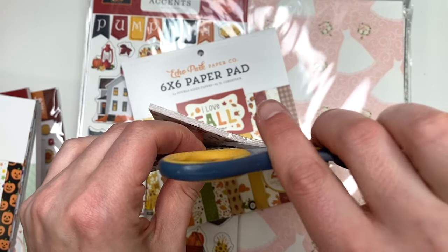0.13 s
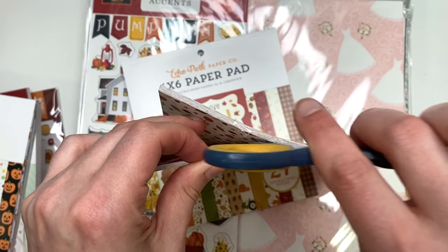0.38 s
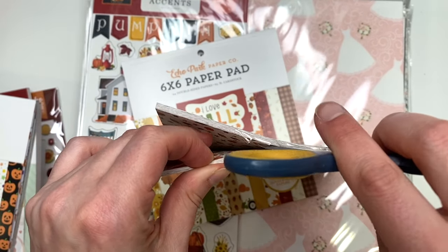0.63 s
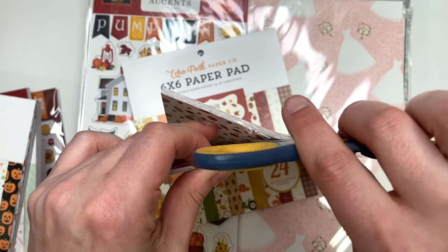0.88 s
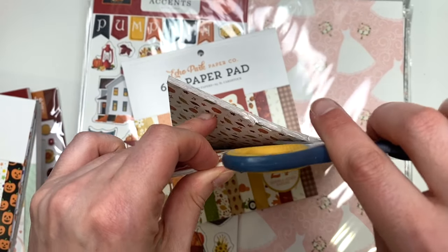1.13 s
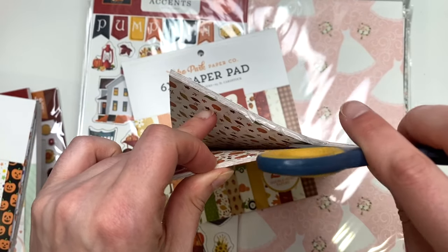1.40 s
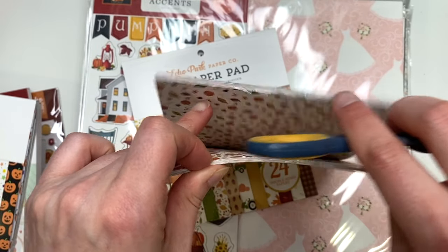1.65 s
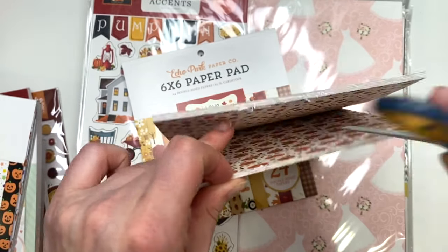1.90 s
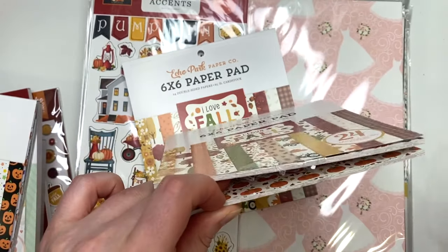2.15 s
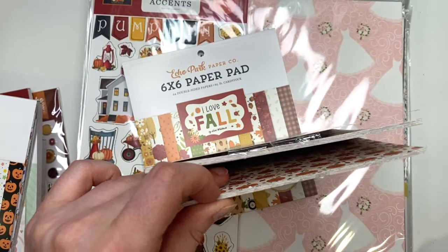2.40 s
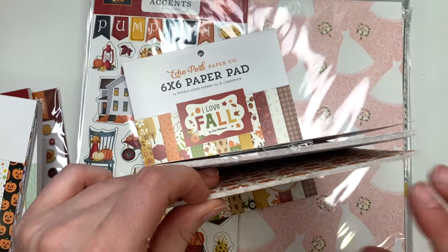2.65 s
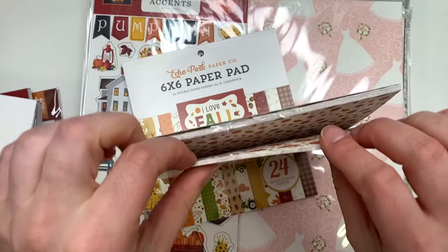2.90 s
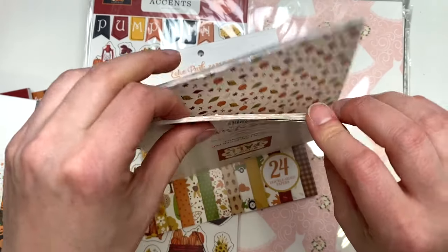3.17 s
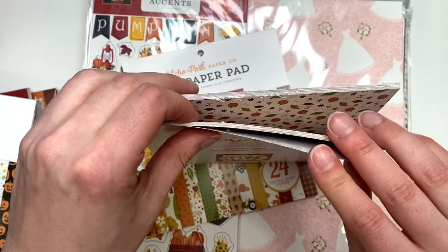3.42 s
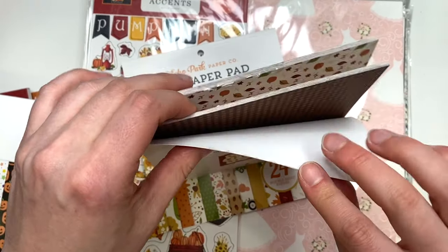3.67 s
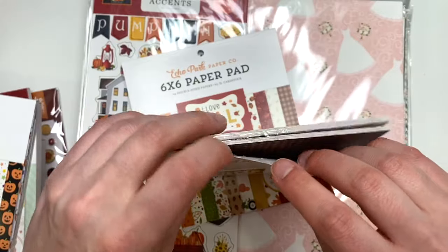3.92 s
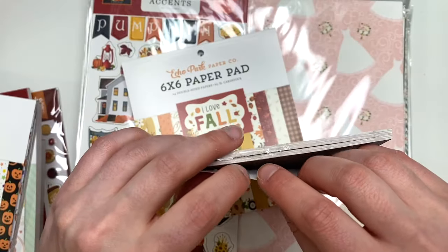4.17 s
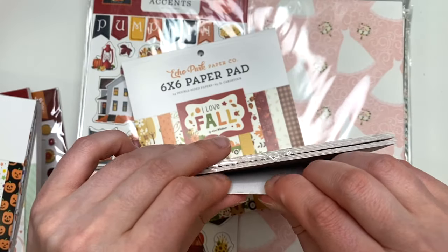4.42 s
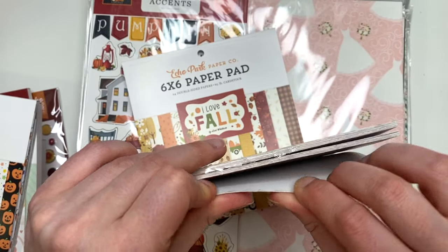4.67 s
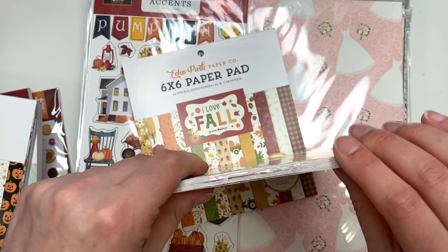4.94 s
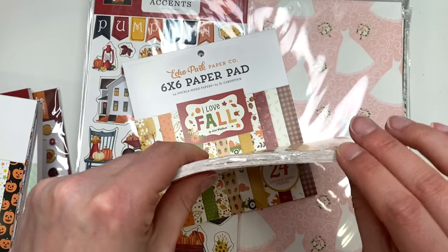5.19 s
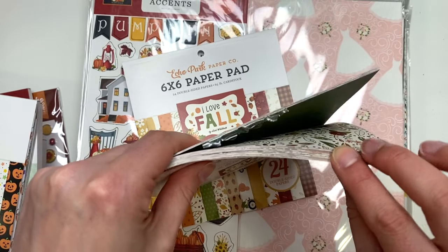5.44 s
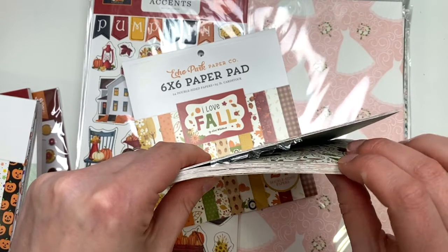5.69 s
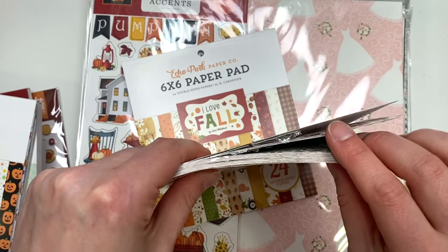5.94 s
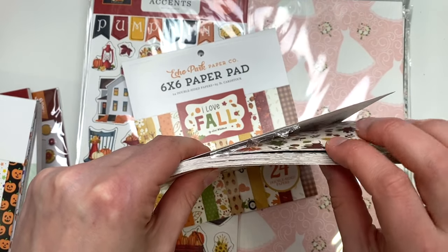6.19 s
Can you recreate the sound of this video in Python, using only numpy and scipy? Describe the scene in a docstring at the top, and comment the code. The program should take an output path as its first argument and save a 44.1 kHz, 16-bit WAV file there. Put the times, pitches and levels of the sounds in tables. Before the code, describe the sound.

Close, dry paper scrapes and a loud pop as a pad's sealed edge gives way, plastic-handled scissors rattle down, then soft sheet handling in a quiet room.

```python
"""Paper rubs and snaps as hands work a scissor blade along the glued edge of a pad; the table top booms softly.
The rub is shaped noise swelling stroke by stroke, and each snap is a short flap tone, a flutter and a crack.
The scissors are laid down and rattle as damped modes of handle and table; fingers then part the sheets,
and noise in a narrow resonance gives the air pocket. A quiet room, as bass-heavy noise, hums and hisses behind.
Two close microphone ports hear all this with different levels and phases."""
import sys
import numpy as np
from scipy import signal
from scipy.fft import rfft, irfft, next_fast_len
from scipy.io import wavfile
from scipy.ndimage import uniform_filter1d, map_coordinates

SR = 44100
rng = np.random.default_rng(int(sys.argv[2]) if len(sys.argv) > 2 else 0)


def file_out(sig):
    """Save sig as 16-bit WAV at sys.argv[1]."""
    # one column per channel
    cols = np.atleast_2d(sig).T
    # limit, then scale
    lim = np.clip(cols, -1, 1)
    pcm = np.round(lim * 32767).astype(np.int16)
    wavfile.write(sys.argv[1], SR, pcm)


def how_loud(loudness_db):
    """Turn decibels into a plain amplitude multiplier (0 dB gives 1, 20 dB gives 10)."""
    steps = np.asarray(loudness_db, float) / 20
    return 10 ** steps


N = 278623  # length in samples

# strokes of rubbing sheets and film: peak_s, rise_ms and fall_ms (per 20 dB of paper body, 4 ms at least),
# paper_db, treble_db
STROKES = [(0.12, 1, 34, -68, -80), (0.218, 12, 135, -66, -79), (0.22, 65, 36, -56.5, -56.6),
           (0.345, 72, 92, -75, -70.5), (0.481, 141, 25, -70, -79.6), (0.504, 299, 117, -73, -94),
           (0.745, 3, 40, -78, -73.5), (0.78, 84, 55, -68, -85), (0.814, 19, 36, -62, -106),
           (0.927, 9.5, 53, -50.5, -58.5), (0.994, 25, 110, -64.5, -75), (0.996, 70, 19, -65, -78),
           (1.174, 31, 20, -81, -81), (1.284, 29, 102, -61, -81.5), (1.333, 66, 38, -63.0, -69),
           (1.536, 79, 64, -68.5, -80), (1.583, 82, 12, -69, -91.7), (1.686, 52, 43, -51, -68.5),
           (1.724, 19, 67, -47, -54.5), (1.803, 38, 33, -48, -46.5), (1.832, 1, 56, -50.5, -63),
           (1.87, 298, 117, -68, -96), (2.002, 42, 94, -65, -69.1), (2.227, 93, 81, -65, -69.5),
           (2.255, 94, 117, -73.5, -64.5), (2.359, 34.5, 54, -44, -54.5), (2.42, 22, 132, -50.5, -64),
           (2.506, 110, 100, -54, -65.5), (2.56, 18, 82, -54, -69), (2.643, 16, 87, -64, -86),
           (2.744, 15, 68, -73, -91.8), (2.851, 135, 32, -86, -62.5), (2.859, 71, 61, -66, -70),
           (2.932, 22, 49, -60, -76), (3.046, 294, 62, -79, -73), (3.096, 56, 60, -60.5, -67.5),
           (3.167, 33, 26, -50, -58), (3.206, 27, 63, -59.5, -59.6), (3.271, 51, 87, -66.5, -65.5),
           (3.341, 5, 57.5, -66, -65.5), (3.44, 80, 75, -81.5, -92), (3.527, 16, 21, -70, -69.5),
           (3.59, 68, 11, -59, -59.5), (3.668, 158, 80, -63.5, -69.3), (3.774, 56, 69, -54, -63),
           (3.802, 47, 191, -63, -90.7), (3.86, 173, 141, -73, -65), (3.978, 84, 71, -62.5, -73.3),
           (4.039, 20, 23, -55, -64.9), (4.13, 141, 152, -64, -68), (4.218, 191, 128, -67, -70.5),
           (4.32, 75, 257, -67.5, -75), (4.362, 18, 139, -65, -63.5), (4.42, 55, 176, -59.5, -65),
           (4.513, 105, 59, -57, -67.5), (4.591, 33, 71, -63, -79.5), (4.639, 21, 153, -56.5, -65.5),
           (4.734, 73, 156, -92, -64), (4.85, 42, 115, -76.1, -67), (4.9, 31, 186, -78, -74.1),
           (5.038, 129, 24, -69, -75.5), (5.162, 160.5, 79.5, -79, -91), (5.284, 70, 10, -79, -105),
           (5.411, 42, 24, -57.5, -65.6), (5.438, -2, 47, -63.5, -80), (5.634, 76, 25, -65.5, -72),
           (5.738, 64, 42, -69.5, -85), (5.796, 11, 37, -81, -87), (5.865, 33, 17, -80, -80.5),
           (5.908, 25, 65, -76, -83), (5.987, 62.5, 35, -72, -80), (6.117, 30, 59, -59.5, -79),
           (6.19, 57, 52, -68.5, -85), (6.254, 40, 31, -57.5, -69), (6.305, 109, 38, -74, -64)]
# resonance of the gap between sheets: time_s, pitch_hz
GAP_PITCH = [(0.0, 1370), (0.28, 1490), (0.33, 2230), (0.67, 1350), (0.74, 2400), (0.84, 1210),
             (1.05, 2120), (1.23, 1450), (1.49, 2600), (1.64, 1580), (2.76, 923), (2.82, 1840),
             (3.03, 1030), (3.15, 1530), (3.8, 1980), (3.82, 1360), (5.16, 1294), (6.32, 1470)]
# spectrum of the paper's rub: pitch_hz, level_db
PAPER_SPECTRUM = [(250, -35), (450, 1.5), (700, -5.5), (1000, 1), (1400, -0.5), (1900, -2.5), (2600, -1),
                  (3500, -7.5), (5000, -8.5), (8000, -52)]
# spectrum of the crinkling film: pitch_hz, level_db
FILM_SPECTRUM = [(1500, -14.5), (3500, -6), (5000, -6), (7000, -0.5), (9000, -2.5), (11000, 0), (13000, -2),
                 (16000, -4.5), (17000, -34.5)]
# resonances of the stiff sheets: pitch_hz, width_hz, boost_db
SHEET_RESONANCES = [(3030, 194, 2), (4106, 640, 1.5), (5200, 370, -0.5), (7240, 200, 2.5)]
# low handling noise in the table: time_s, level_db
HANDLING = [(0.0, -79), (0.17, -62), (0.33, -58), (0.53, -64.5), (1.56, -67.5), (1.85, -55.5),
            (2.13, -67.5), (2.39, -69.5), (2.51, -51), (2.85, -63), (3.1, -52.5), (3.4, -70), (4.08, -59),
            (4.35, -70.5), (5.38, -70.5), (5.54, -64), (6.12, -69.5), (6.32, -67)]
# spectrum of that handling noise: pitch_hz, level_db
BOOM_SPECTRUM = [(20, -31.5), (35, 1.5), (55, 2), (110, -3), (150, -9), (250, -13), (450, -22), (800, -46)]
SPLIT_HZ, UPPER_DB = 3800, 4.5  # above the split the paper's strength lies between body and treble
TREBLE_STEEPER = 1.3  # the treble swells and dies faster in dB


def rubbing():
    """Friction noise: sliding sheets coloured by gap resonance, crinkling film, and handling in the table."""
    t = np.arange(N) / SR
    *shape, paper_db, treble_db = np.transpose(STROKES)
    gap_hz = lambda time: np.interp(time, *np.transpose(GAP_PITCH))
    stutter = how_loud(wobble(40))  # the grip slips unevenly
    paper = rush(PAPER_SPECTRUM, patchy_db=5.0, grit_db=2.0, hump_hz=gap_hz, hump_db=4)
    film = rush(FILM_SPECTRUM, patchy_db=2.5, grit_db=1.5)
    handling_db = np.interp(t, *np.transpose(HANDLING)) + 1.5 * wobble(25)
    boom = how_loud(handling_db) * rush(BOOM_SPECTRUM, patchy_db=1, grit_db=0)

    lower_paper = filtered(paper, lambda hz: 1 / (1 + (hz / SPLIT_HZ) ** 4))
    upper_paper = paper - lower_paper
    body = swells(*shape, paper_db)
    treble = swells(*shape, treble_db, TREBLE_STEEPER)
    between = how_loud(UPPER_DB) * np.sqrt(body * treble)
    rub = stutter * (body * lower_paper + between * upper_paper + treble * film)

    def sheet_response(f):
        """Resonance: Gaussian peaks in dB that add where they overlap."""
        return how_loud(sum(db * np.exp(-((f - hz) / width) ** 2) for hz, width, db in SHEET_RESONANCES))

    return filtered(rub, sheet_response) + boom


# snaps of seal, film and sheet edges: start_s, level_db, pitch_hz, crack_db (against the flap), flutter_t60_s
SNAPS = [(0.119, -59.5, 1470, 20, 0.081), (0.155, -62, 1380, 21, 0.027), (0.165, -72, 988, 18, 0.027),
         (0.181, -45, 1480, 3, 0.028), (0.214, -37.5, 1020, -29, 0.031), (0.467, -57.5, 2310, -23, 0.076),
         (0.546, -75.5, 2500, 17.5, .02), (0.82, -47.5, 830, -36, 0.02), (0.921, -48, 1540, -8, 0.024),
         (0.943, -24, 1260, -0.5, 0.019), (0.987, -22.5, 1880, -38, 0.015), (1.369, -61, 1430, 9, 0.01),
         (1.422, -60, 2460, 8.5, 0.041), (1.582, -65, 2520, -12, .015), (1.651, -11, 1590, -40, 0.017),
         (1.717, -37.5, 4700, -11, 0.031), (1.72, -23.5, 1200, -28, 0.037), (1.752, -40, 1500, -11, 0.023),
         (1.87, -36.5, 2550, -1, 0.019), (2.743, -52.5, 1000, -17, 0.05), (2.857, -47, 1400, -11, 0.041),
         (3.03, -45, 1000, -35, 0.082), (3.067, -44, 1460, -23, 0.048), (3.158, -34, 1570, 4.5, 0.018),
         (3.735, -45, 2640, -6, 0.05), (3.829, -37.5, 1180, -58, 0.03), (3.861, -40, 1290, 6.5, 0.038),
         (3.971, -40, 1280, -28.5, 0.019), (3.983, -36.5, 1410, -30, 0.014), (4.275, -52, 1490, -19, 0.085),
         (4.497, -34.5, 3240, -1, 0.019), (4.636, -34, 920, -52.5, 0.035), (4.715, -36.5, 700, -22, 0.019),
         (5.374, -51, 1490, -5, 0.049), (5.379, -41.5, 940, 0.5, 0.035), (5.441, -50, 930, 2, 0.026),
         (5.689, -55.5, 1310, -6, 0.024), (5.707, -67, 2000, 2, .012), (5.726, -60, 1440, -23, 0.066),
         (5.866, -70, 3500, 5, 0.013), (5.911, -54.5, 1310, -3, 0.016), (6.1, -49, 4100, -41.5, 0.033),
         (6.111, -34.5, 1370, -8.5, 0.024), (6.237, -46.5, 1500, -22, 0.045)]
SNAP_LEFT_DB = 2  # the pad is held a little to the left


def snaps():
    """Sudden release: a sheet rings for a few cycles at its flap pitch, flutters noisily and cracks."""
    track, t = np.zeros((2, N + SR)), np.arange(SR // 8) / SR
    sides = np.array([[1], [-1]])
    for start_s, level_db, hz, crack_db, t60 in SNAPS:
        noise = rng.standard_normal(len(t))
        flutter = unit(signal.lfilter(*signal.iirpeak(hz, 1.6, SR), noise))
        flap = np.sin(2 * np.pi * hz * t) * how_loud(-60 * t / (0.41 * t60))
        flap = flap + 0.4 * flutter * how_loud(-60 * t / t60)
        crack = how_loud(crack_db - 60 * t / 0.0094) * bright(len(t))
        onset = 1 - np.exp(-t / 0.00099)
        add(track, start_s, how_loud(level_db + SNAP_LEFT_DB / 2 * sides) * onset * (flap + crack))
    return track[:, :N]


# scissors touching the table: start_s, handle_db, crack_db, table_db, boom_db
DROPS = [(2.334, -28.5, -23, -46, -60), (2.349, -31.5, -35, -55, -48), (2.418, -37.5, -49, -43.5, -53),
         (2.434, -41.5, -56, -62.5, -56), (2.468, -29.5, -28.5, -19, -27.5),
         (2.474, -49.5, -38.5, -26.5, -50), (2.486, -44.5, -36.5, -46, -45), (2.494, -34.5, -28, -32, -46),
         (2.559, -41, -35.5, -52, -69), (2.638, -44.5, -52.5, -51.5, -50)]
# modes of the plastic handles: pitch_hz, level_db, t60_s
HANDLE_MODES = [(397.3, -7, 0.11), (483, -30.5, 1.15), (824, -7, 0.096), (905, -4, 0.084),
                (953, -0.5, 0.057), (1460, -9, 0.054), (1710, -7.5, 0.045), (1854, -6.5, 0.023),
                (2310, -12, 0.051), (3030, -14, 0.036)]
# modes of the knocked table: pitch_hz, level_db, t60_s
TABLE_MODES = [(257, -21, 0.19), (304, -13.5, 0.064), (431, 7.5, 0.012), (787, -6, 0.038),
               (1000, -11, 0.019)]


def scissors():
    """Impact excites modes: each touch rings the handles, knocks the table and starts its low boom."""
    track, t = np.zeros(N + SR), np.arange(SR // 2) / SR
    for start_s, handle_db, crack_db, table_db, boom_db in DROPS:
        chatter_db = 2 * unit(uniform_filter1d(rng.standard_normal(len(t)), size=130))  # the loose joint
        handle = how_loud(handle_db) * how_loud(chatter_db) * ring(HANDLE_MODES, t, 2)
        table = how_loud(table_db) * ring(TABLE_MODES, t, 1)
        crack = how_loud(crack_db - 60 * t / 0.01) * bright(len(t))
        boom = (1 - np.exp(-t / 0.0022)) * ring([(137.5, boom_db, 0.3)], t, 0)
        add(track, start_s, (1 - np.exp(-t / 0.00056)) * (handle + table + crack + boom))

    def lag(hz):
        """Path difference: the handle's low modes reach the left port later, by at most 0.3 ms."""
        late_s = 0.0003 / (1 + (hz / 1100) ** 4) * hz ** 2 / (hz ** 2 + 300 ** 2)
        return np.exp(-2j * np.pi * hz * late_s)

    # the scissors lie to the right
    return np.array([filtered(track[:N], lag), how_loud(2.0) * track[:N]])


# knocks passed into the table top: start_s, level_db, pitch_hz, t60_s, upper_mode_db (against the low one)
THUMPS = [(0.185, -43.5, 121, 0.15, -7.5), (0.213, -39.5, 96, 0.075, -7), (0.242, -47, 45, 0.28, -40),
          (0.33, -49, 42, 0.33, -42), (0.926, -38.5, 97, 0.058, -9), (0.99, -41.5, 113, 0.13, -6.5),
          (1.295, -48, 103, 0.16, -7), (1.656, -26.5, 139.5, 0.036, -4.5), (1.886, -42, 111, 0.055, -5),
          (3.085, -29, 117, 0.047, -18), (3.603, -50, 114, 0.16, -25), (3.87, -49.5, 117, 0.13, -5),
          (4.642, -48.5, 108, 0.11, -14), (4.661, -49, 55, 0.29, -40), (4.716, -39.5, 99, 0.039, -20),
          (5.43, -39.5, 99.4, 0.07, -14.5)]


def thumps():
    """Damped plate modes: soft contact stirs a low, uneven boom of the table top and a mode above it."""
    track, t = np.zeros(N + SR), np.arange(SR // 2) / SR
    for start_s, level_db, hz, t60, upper_db in THUMPS:
        onset = 1 - np.exp(-t / 0.0016)
        modes = [(hz, 0, t60), (300, upper_db, 0.08)]
        add(track, start_s, how_loud(level_db) * onset * ring(modes, t, 0))
    return track[:N] * how_loud(1.5 * wobble(70))


# air pocket between parted sheets: peak_s, rise_ms and fall_ms (per 20 dB, 4 ms at least), level_db
POCKET_SWELLS = [(4.041, 100, 23, -62.5), (5.03, 121, 31, -71), (5.72, 40, 70, -80), (5.8, 17, 35, -76),
                 (5.981, 128, 43, -71.5), (6.112, 34, 22, -69), (6.15, 33, 100, -74),
                 (6.245, 80, 152, -65.5)]


def pocket():
    """Cavity resonance: rubbing stirs a narrow band of noise in the wedge between two sheets."""
    level = swells(*np.transpose(POCKET_SWELLS)) * how_loud(1.24 * wobble(60))
    spectrum = [(900, -32), (1200, 7), (1400, 16.5), (1600, -3.5), (2100, -33)]  # (Hz, dB)
    return level * rush(spectrum, patchy_db=2.0, grit_db=1.5)


# decay of the room: pitch_hz, t60_s
ROOM_DECAY = [(200, 0.33), (2000, 0.13), (10000, 0.06)]


def room(x):
    """Reverberation: each frequency dies at its own speed; the treble reaches both ports alike."""
    hz, t, z = signal.stft(rng.standard_normal((2, SR // 3)), SR, nperseg=256)
    z[1, hz > 6300] = z[0, hz > 6300]
    decay = how_loud(-60 * t / along(ROOM_DECAY, hz)[:, None])
    tail = signal.istft(z * decay, SR, nperseg=256)[1]
    tail = tail / np.linalg.norm(tail, axis=1, keepdims=True)
    delayed = np.pad(x, (200, 0))[None]  # the answer starts 200 samples late
    return signal.fftconvolve(delayed, tail, axes=1)[:, :N]


# spectrum of room and microphone hiss: pitch_hz, level_db
AIR_SPECTRUM = [(20, -28.5), (40, 2), (70, 1), (150, -5.5), (600, -20.5), (1500, -27.5), (4000, -36.5),
                (8000, -39.5), (12000, -52.5), (13500, -50.5), (16000, -48.5)]


def air():
    """Background noise: the quiet room's low hum and the microphone's hiss, as steady shaped noise."""
    return how_loud(-72.5) * rush(AIR_SPECTRUM, patchy_db=4.5, grit_db=2.5)


def swells(peak_s, rise_ms, fall_ms, db, steep=1):
    """Energy sum of overlapping strokes: each climbs to its peak and falls away ever faster in dB."""
    t = np.arange(0, N + 64, 64) / SR
    late_ms = 1000 * (t - peak_s[:, None])
    span_ms = np.where(late_ms < 0, rise_ms[:, None], fall_ms[:, None]).clip(4)
    gain = how_loud(db[:, None] - 20 * steep * abs(late_ms / span_ms) ** 2)
    return np.interp(np.arange(N) / SR, t, np.linalg.norm(gain, axis=0))


# left-right likeness of noise: pitch_hz, correlation (0 to 1)
ALIKE = [(60, 0.99), (150, 0.82), (300, 1), (700, 0.58), (1500, 0.6), (4000, 0.82), (5800, 0.093),
         (6500, 1)]


def rush(spectrum, patchy_db, grit_db, hump_hz=None, hump_db=0):
    """Shaped stereo noise of rms 1: patches in time and pitch, a shared gritty grain, a moving hump."""
    grit = how_loud(grit_db * wobble(700))
    hz, t, z = signal.stft(grit * rng.standard_normal((2, N)), SR, nperseg=256)
    field = rng.standard_normal(z.shape[1:])
    field = uniform_filter1d(uniform_filter1d(field, 2, 0), 32, 1)
    gain_db = patchy_db * unit(field)
    if hump_hz is not None:
        log_distance = np.log((hz[:, None] + 1) / hump_hz(t))
        gain_db = gain_db + hump_db * np.exp(-(log_distance / 0.18) ** 2)
    pair = signal.istft(z * how_loud(gain_db), nperseg=256)[1][:, :N]

    def mid_side(hz):
        """Correlation: the shares of mid and side set how alike the two channels are."""
        angle = np.arccos(np.clip(along(ALIKE, hz), 0, 1)) / 2
        return how_loud(along(spectrum, hz)) * np.array([np.cos(angle), np.sin(angle)])

    mid, side = filtered(pair, mid_side)
    return unit(np.array([mid + side, mid - side]))


def ring(modes, t, spread_db):
    """Modal sum: exponentially damped sines, each at a new random strength around its level."""
    sound = 0
    for hz, db, t60 in modes:
        level = how_loud(db + rng.normal(0, spread_db) - 60 * t / t60)
        sound = sound + level * np.sin(2 * np.pi * hz * t)
    return sound


def bright(count):
    """Differenced noise: a crack weak in the bass and strongest at the very top."""
    return np.convolve(rng.standard_normal(count), [1, -0.4, 0, -0.6])[:count]


def wobble(rate):
    """Band-limited fluctuation: a smooth random curve with this many knots a second."""
    knots = rng.standard_normal(int(N * rate / SR) + 4)
    return map_coordinates(knots, [np.arange(N) * rate / SR])


def filtered(x, response):
    """Linear filtering: the spectrum of x times a complex response of frequency."""
    m = next_fast_len(N + 8192)
    return irfft(rfft(x, m) * response(np.fft.rfftfreq(m, 1 / SR)), m)[..., :N]


def along(points, hz):
    """Logarithmic pitch scale: (Hz, value) points joined by straight lines on a log axis."""
    f, v = np.transpose(points)
    return np.interp(np.log(hz + 1), np.log(f + 1), v)


def unit(x):
    """Power normalisation: x scaled to rms 1."""
    return x / np.sqrt(np.mean(x ** 2) + 1e-20)


def add(track, start_s, sound):
    """Superposition: mix a sound into the track from its start time."""
    start = round(start_s * SR)
    track[..., start:start + sound.shape[-1]] += sound


def scene():
    """Superposition of close hits with a little reverberation, the rubbing, the pocket and the room's air."""
    hits = snaps() + scissors() + thumps()
    return hits + how_loud(-11.0) * room(hits.mean(0)) + rubbing() + pocket() + air()


def band_limit(x):
    """A steep low-pass at the top of the band."""
    return signal.sosfilt(signal.butter(12, 16960, fs=SR, output="sos"), x)


# phase between the microphone ports: pitch_hz, left_lead_rad
PORT_LEAD = [(0, 0), (600, -.2), (1400, .1), (2600, .7), (4800, .2), (7000, 0), (9000, -np.pi),
             (11200, -2 * np.pi), (13150, -3 * np.pi), (15100, -4 * np.pi)]
# level between the microphone ports: pitch_hz, left_minus_right_db
PORT_LEVEL = [(100, .5), (600, 4.5), (1500, 1.5), (3000, 4.5), (5500, 5), (6500, 0)]
TOP_HZ = 16100  # middle of the treble roll-off


def record(dry):
    """Two-port reception: levels and phases differ, the treble phase turns steadily, both ends roll off."""
    def half(hz):
        """Symmetric split: each port takes half the difference in level and phase."""
        return how_loud(along(PORT_LEVEL, hz) / 2) * np.exp(0.5j * np.interp(hz, *np.transpose(PORT_LEAD)))

    def ports(hz):
        """Band limits: a bass roll-off near 36 Hz and a 35 dB treble shelf on both ports."""
        treble = how_loud(-35 / (1 + np.exp(np.clip((TOP_HZ - hz) / 120, -50, 50))))
        bass = hz ** 4 / (hz ** 4 + 36 ** 4)
        return np.array([half(hz), 1 / half(hz)]) * treble * bass

    mix = filtered(dry, ports)
    return band_limit(mix)


dry = scene()
out = record(dry)
file_out(out)
```